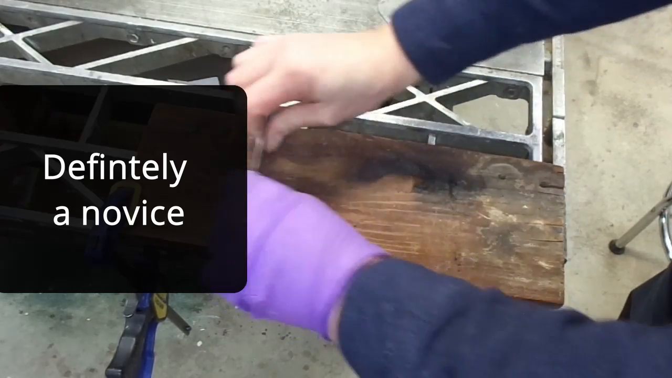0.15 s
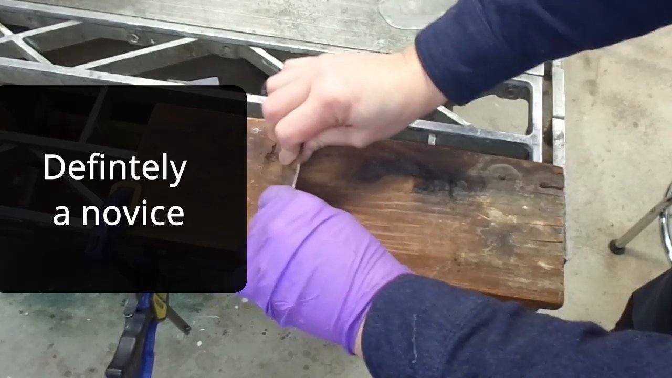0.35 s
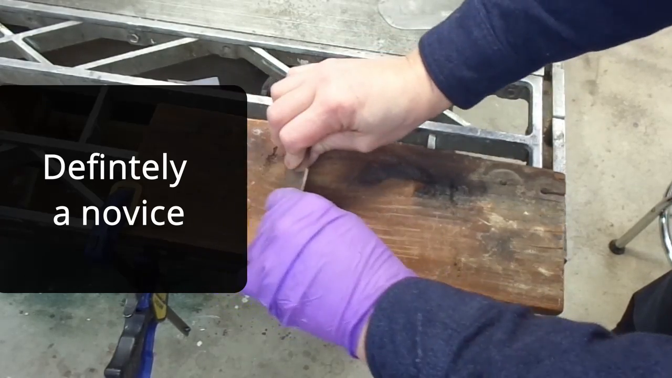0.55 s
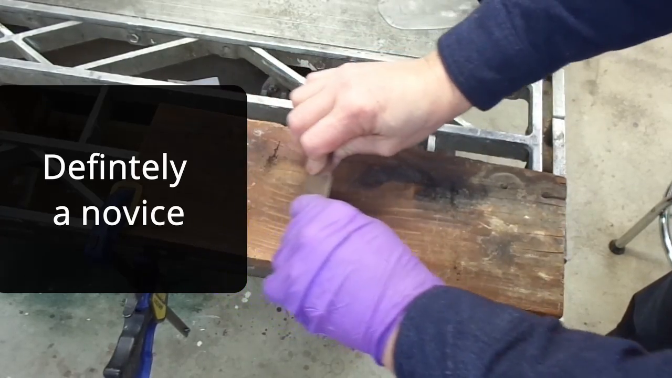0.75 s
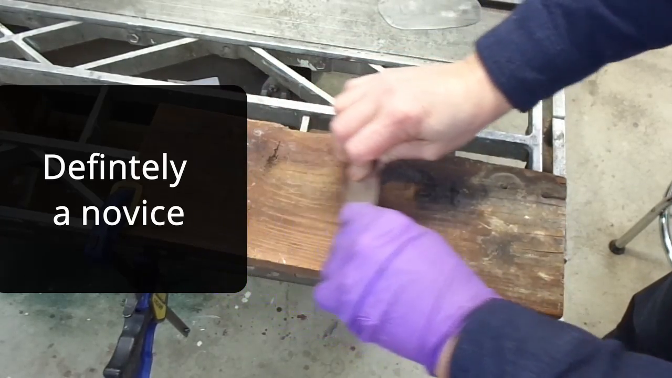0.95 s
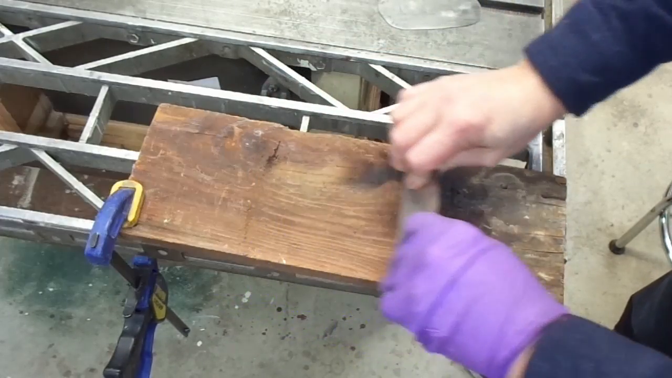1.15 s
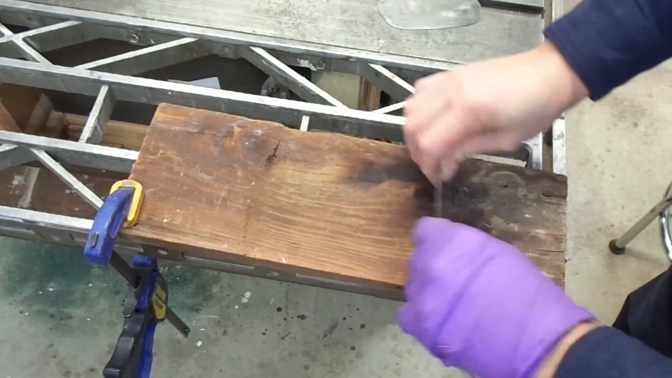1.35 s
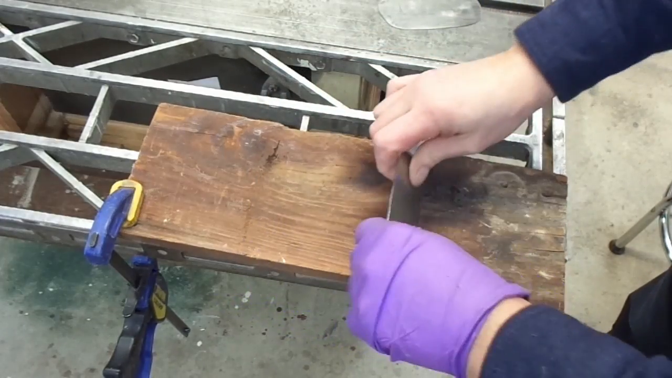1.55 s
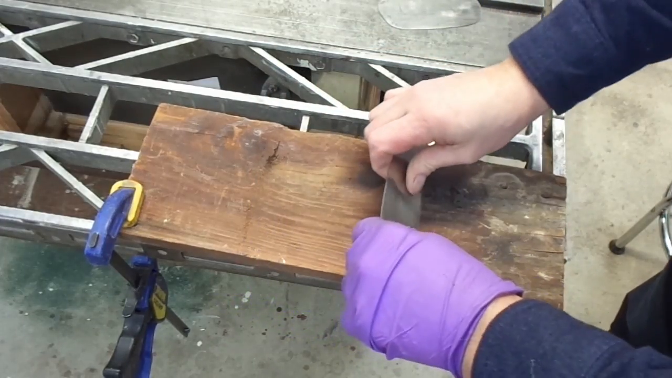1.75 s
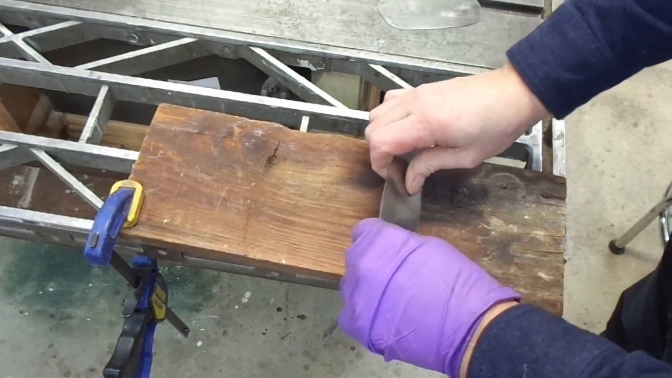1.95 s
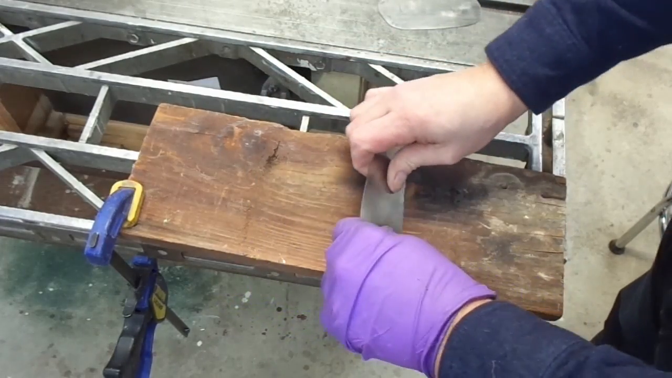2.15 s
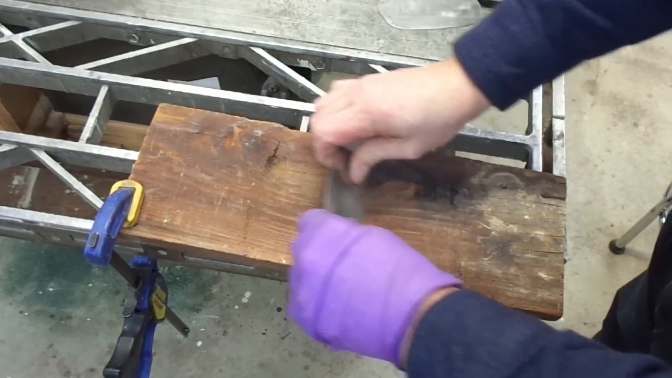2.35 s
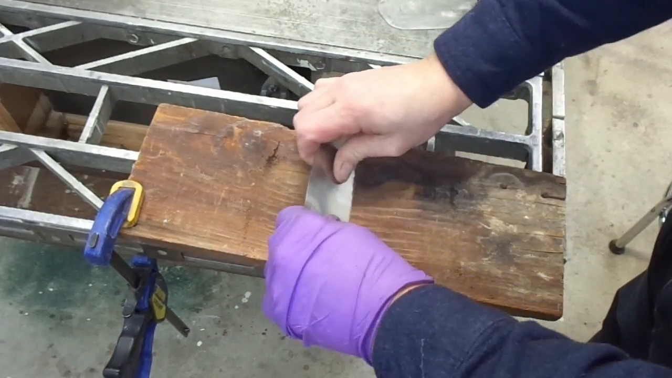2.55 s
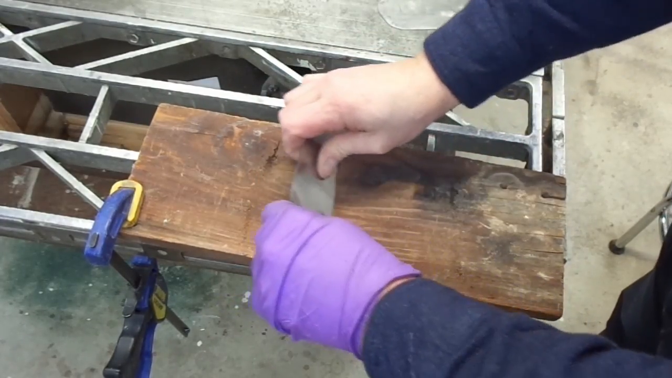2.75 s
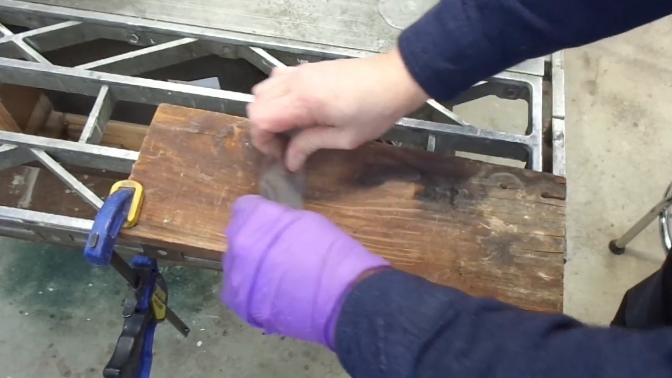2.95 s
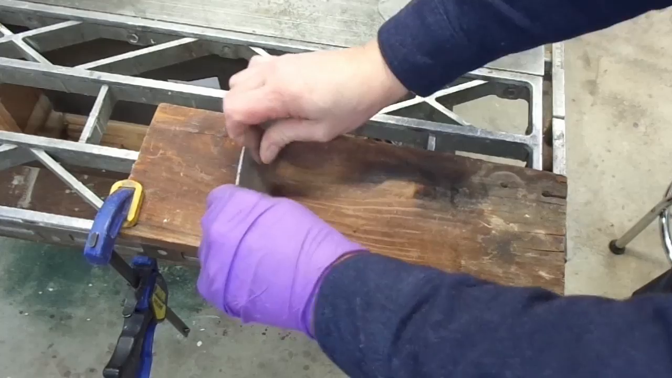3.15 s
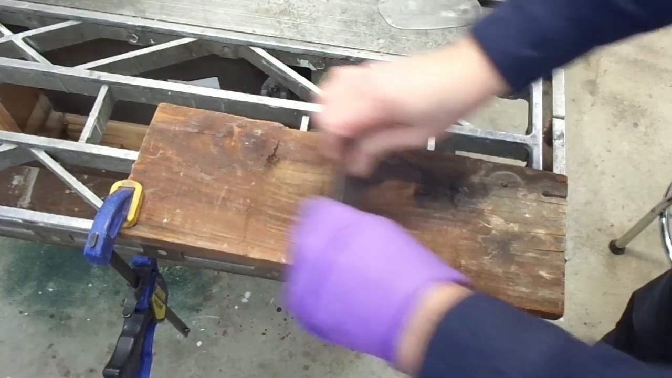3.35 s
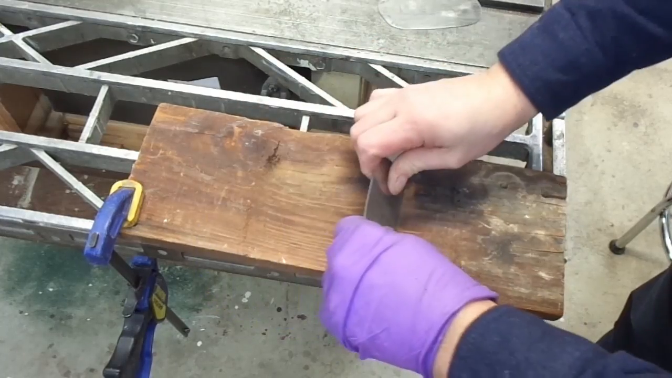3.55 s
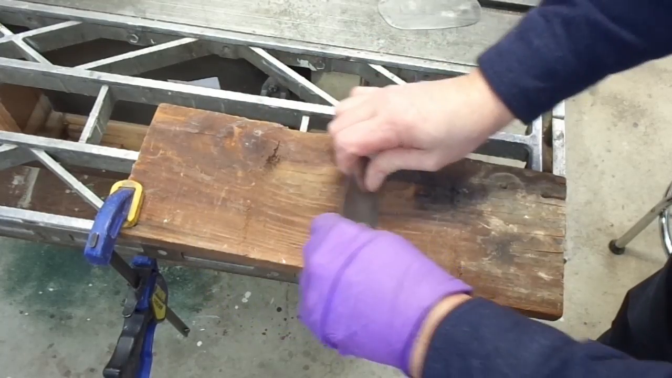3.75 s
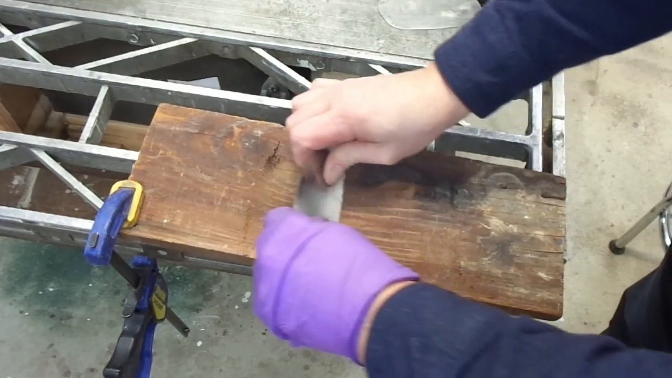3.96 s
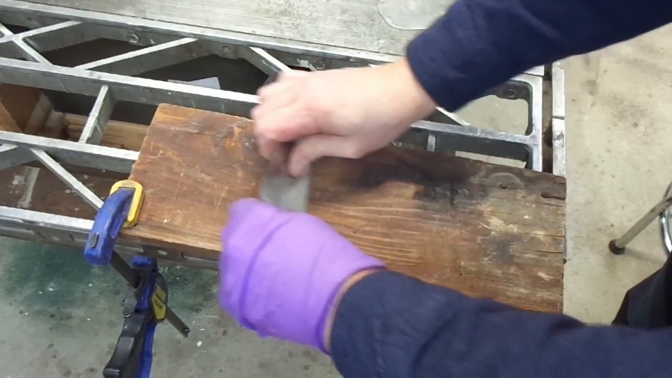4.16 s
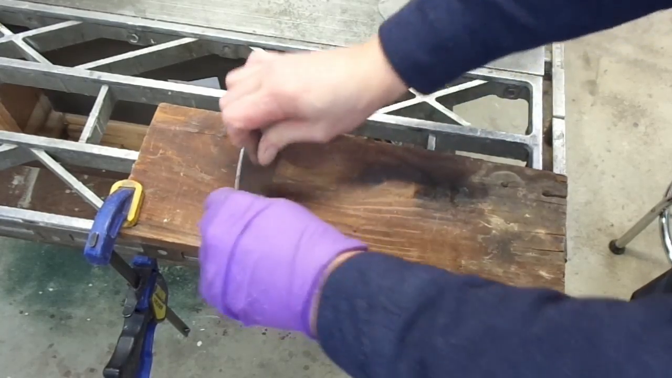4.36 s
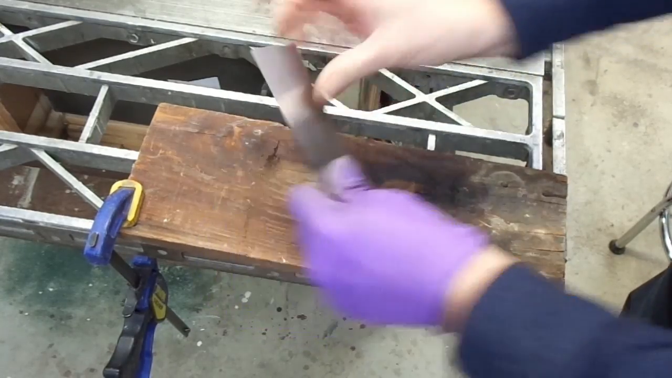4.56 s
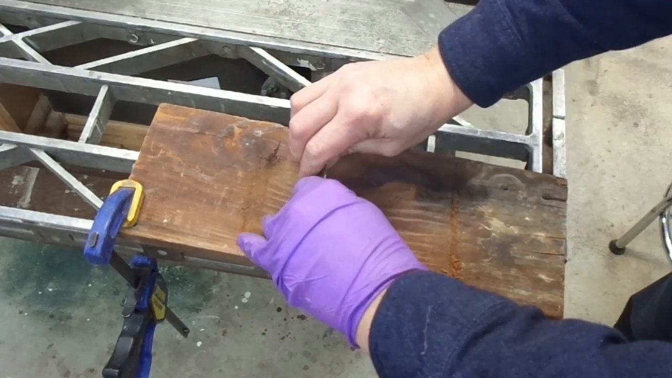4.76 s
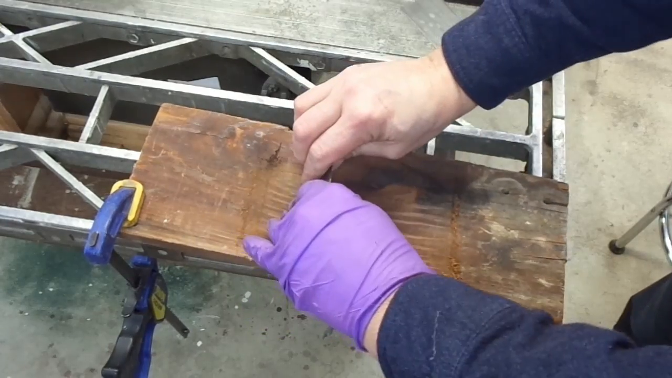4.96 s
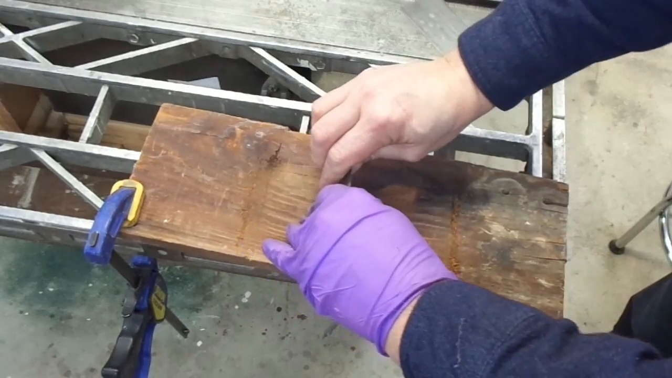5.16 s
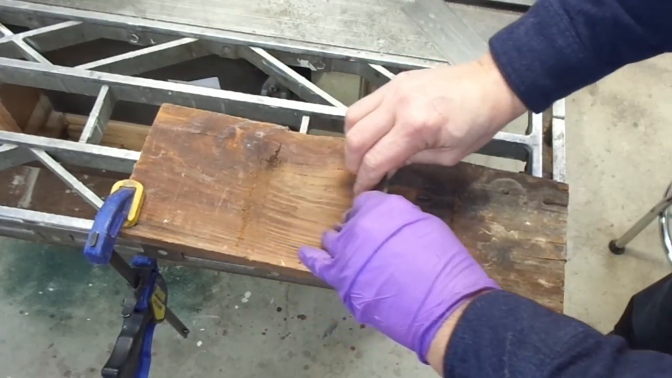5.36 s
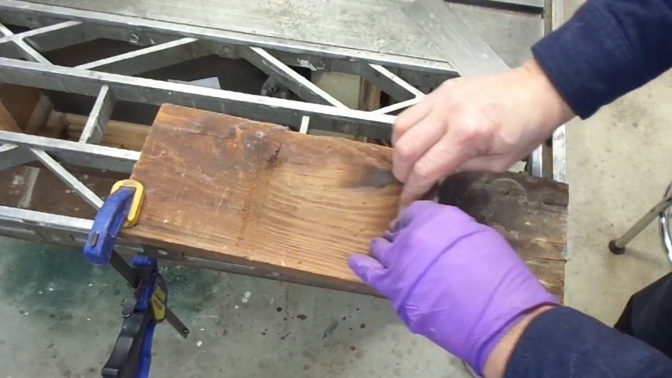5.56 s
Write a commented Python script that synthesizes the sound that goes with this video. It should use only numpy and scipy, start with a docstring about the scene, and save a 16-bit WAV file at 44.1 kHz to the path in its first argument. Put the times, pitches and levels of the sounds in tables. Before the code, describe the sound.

Close mono pickup of hand scraping on a clamped wooden board. Dry, grainy strokes swell and stop abruptly, with hollow woody body and papery treble hiss. Loud wooden knocks come early and midway, far above the scraping, and light steel finger ticks fill gaps. A short room tail and quiet background noise surround one long early push, several brief ones, two medium ones and a long closing one.

```python
"""A steel card scraper is pushed in dry strokes along a rough board clamped to a ladder in a workshop.
The tail of a push and a knock of the blade lead to one long, chattering push, more knocks and a finger tick;
five short scrapes, a tick, a knock, two more pushes and two ticks follow, then a last long push.
Strokes are random fibre snaps through board resonances; knocks and ticks are noise bursts and decaying modes.
The room adds a short tail of decaying noise, over a rush of coloured noise that drops a little near 4.65 s."""
import sys
import numpy as np
from scipy import signal
from scipy.fft import rfft, irfft
from scipy.io import wavfile

SR = 44100
rng = np.random.default_rng(int(sys.argv[2]) if len(sys.argv) > 2 else 0)


def master_out(mix):
    """Clip the mix to full scale and print it as 16-bit PCM to the path in sys.argv[1]."""
    frames = np.transpose(np.atleast_2d(mix))
    ceiling = np.clip(frames, -1, 1)
    pcm = np.round(ceiling * 32767).astype(np.int16)
    wavfile.write(sys.argv[1], SR, pcm)


N = 250929
TIME = np.arange(N) / SR


def from_db(db):
    """Decibels to gain."""
    return 10 ** (np.asarray(db) / 20)


def rms_one(x):
    """Scale to unit rms."""
    return x / np.sqrt(np.mean(x ** 2) + 1e-20)


def at_hz(points, hz):
    """Read a curve on a log-frequency axis."""
    point_hz, value = np.transpose(points)
    return np.interp(np.log(np.maximum(hz, 1)), np.log(point_hz), value)


def butter(x, hz, kind, order=2):
    """Causal Butterworth filter."""
    sos = signal.butter(order, np.clip(hz, 10, .45 * SR), kind, fs=SR, output="sos")
    return signal.sosfilt(sos, x + 1e-18)


def response(spectrum, size=8192):
    """The minimum-phase impulse response with this spectrum, by folding its cepstrum."""
    level_db = at_hz(spectrum, np.fft.rfftfreq(size, 1 / SR))
    cepstrum = irfft(np.log(from_db(level_db)))
    cepstrum[1:size // 2] *= 2
    cepstrum[size // 2 + 1:] = 0
    return irfft(np.exp(rfft(cepstrum)))


def through(x, impulse):
    """Pass a sound through an impulse response."""
    return signal.fftconvolve(x, impulse)[:N]


def resonance(x, hz, width_hz):
    """Two-pole resonance with gain 1 on top."""
    radius = np.exp(-np.pi * width_hz / SR)
    zeros = np.array([1, 0, -1]) * (1 - radius ** 2) / 2
    poles = [1, -2 * radius * np.cos(2 * np.pi * hz / SR), radius ** 2]
    return signal.lfilter(zeros, poles, x + 1e-18)


def lifted(x, peaks):
    """Raise each resonance in turn out of a broad sound."""
    for hz, width_hz, lift_db in peaks:
        x = x + (from_db(lift_db) - 1) * resonance(x, hz, width_hz)
    return x


def ringing(modes, t):
    """Decaying sine modes of alternating sign; each blow varies their levels at random by about 1 dB."""
    out = np.zeros(len(t))
    for k, (hz, level_db, t60_s) in enumerate(modes):
        envelope = from_db(level_db + rng.normal() - 60 * t / t60_s)
        out += (-1) ** k * envelope * np.sin(2 * np.pi * hz * t)
    return out


def add(track, s, sound):
    """Mix a short sound in at a time."""
    start = max(round(s * SR), 0)
    track[start:start + len(sound)] += sound[:N - start]


def workshop_rush():
    """Rush of the workshop, nearly steady, dropping a little near 4.65 s: noise with a broad colour and peaks."""
    # broad colour before levelling: pitch_hz, density_db (per Hz)
    rush_colour = [(12, -30), (20, -31), (32, -10.5), (64, -18.5), (194, -15.5), (263, -13.5), (387, -12.5),
                   (525, -10), (693, -11), (796, -11), (2550, -16.5), (2930, -17), (4200, -20), (5530, -22),
                   (15000, -23)]
    # resonances in the rush: pitch_hz, width_hz, lift_db
    rush_peaks = [(66.4, 6.9, 13.5), (123, 6, 8), (884, 90, 3), (1140, 100, 5.5)]
    # level in the mix: time_s, level_db
    rush_level = [(0, -60), (4.64, -59.5), (4.67, -63), (5.69, -61)]
    coloured = through(rng.standard_normal(N), response(rush_colour))
    time_s, level_db = np.transpose(rush_level)
    return rms_one(lifted(coloured, rush_peaks)) * from_db(np.interp(TIME, time_s, level_db))


def workshop_reflections(first_s):
    """Diffuse reflections of unit energy: bands of noise whose decay is shortest in the top treble."""
    # decay of the workshop: pitch_hz, t60_s
    room_decay = [(150, 0.71), (600, 0.21), (2000, 0.27), (5000, 0.19), (14000, 0.059)]
    t, out = np.arange(SR // 2) / SR, 0
    edges_hz = np.geomspace(80, 18000, 10)
    for low_hz, high_hz in zip(edges_hz, edges_hz[1:]):
        band = butter(rng.standard_normal(len(t)), [low_hz, high_hz], "band")
        t60_s = at_hz(room_decay, np.sqrt(low_hz * high_hz))
        out = out + band * np.exp(-np.log(1000) * t / t60_s)
    return rms_one(out * (t > first_s)) / np.sqrt(len(t))


def blade_ticks(tick_s, width_hz):
    """Blade handled in the fingers: a short resonant noise tick while the thin steel rings down."""
    # ticks: start_s, tick_db, tick_centre_hz, ring_db
    finger_ticks = [(1.837, -37.5, 4260, -85), (3.195, -35, 3800, -82), (4.5117, -39, 2600, -51),
                    (4.55, -49, 4800, -47)]
    # modes of the steel blade: pitch_hz, level_db, t60_s
    blade_modes = [(917, -3.5, 0.16), (2450, -10.5, 0.12), (4740, -11.5, 0.12), (5421, -13, .08)]
    out, t = np.zeros(N), np.arange(SR // 2) / SR
    for start_s, tick_db, tick_hz, ring_db in finger_ticks:
        burst = rng.standard_normal(len(t)) * np.exp(-t / tick_s)
        tick = resonance(burst, tick_hz, width_hz)
        add(out, start_s, from_db(tick_db) * tick + from_db(ring_db) * ringing(blade_modes, t))
    return out


def knocks(ring_db, crack_s, rattle_db, rattle_s, low_cut_hz):
    """Blade set down: thud, board modes and ladder rattle, dulled by a soft contact; a steel corner cracks."""
    # blows: start_s, level_db, contact_cutoff_hz, crack_db (re blow)
    blows = [(0.3051, -15, 890, -37), (0.3153, -15.5, 1720, -15), (0.3215, -28, 1950, -20),
             (1.5217, -25.5, 1180, -26), (1.5642, -50, 1500, -21), (1.5974, -38, 890, -30),
             (3.5147, -16.5, 1980, -30)]
    # colour of the first thud: pitch_hz, level_db
    thud_colour = [(50, -37), (150, -63), (350, -10), (650, -11.5), (1050, -4), (1400, 3.5), (1700, -4),
                   (2300, 4), (2700, -17), (5000, -13.5), (15000, -79)]
    # first swing of the board under the blow: pitch_hz, level_db, t60_s
    swing_modes = [(1123, 0, 0.014), (633, -9.5, 0.018)]
    # modes of the free board: pitch_hz, level_db, t60_s
    board_modes = [(380, -24, 0.21), (530, -23, 0.3), (649, -9, .12), (680, -32, 0.091), (900, -23, 0.12),
                   (980, -26, 0.088), (1160, -24, 0.075), (1100, -13, 0.098), (1140, -26, 0.15),
                   (1450, -1.5, 0.075), (1610, -8, 0.074), (1820, -22.5, 0.15), (1810, -7, 0.17),
                   (2040, -21, 0.064), (2320, -9, 0.12), (2347, -4, .1)]
    # steel struck on its corner: pitch_hz, width_hz, lift_db
    corner_peaks = [(2990, 150, 16.5), (3510, 91, 14.5), (5800, 51, 7), (6770, 51, 1)]
    out, thud = np.zeros(N), response(thud_colour)
    thud = thud / np.abs(thud).max()
    t = np.arange(len(thud)) / SR
    for start_s, level_db, contact_hz, crack_db in blows:
        shaking = rng.standard_normal(len(t)) * t / rattle_s * np.exp(-t / rattle_s)
        rattle = through(shaking, thud)[:len(t)]
        body = .5 * thud + ringing(swing_modes, t)
        body = body + from_db(ring_db) * ringing(board_modes, t) + from_db(rattle_db) * rattle
        dulled = butter(body, contact_hz, "low", order=3)
        burst = rng.standard_normal(len(t)) * np.exp(-t / crack_s)
        crack = lifted(butter(burst, [900, 3500], "band", order=1), corner_peaks)
        add(out, start_s, from_db(level_db) * (dulled + from_db(crack_db) * crack))
    return butter(out, low_cut_hz, "high")


def catches(board, slip_s):
    """The edge hangs on a ridge of the grain and slips free with a short, dull jolt of the board."""
    # slips: start_s, peak_db
    slips = [(0.845, -45), (1.179, -32), (1.297, -35), (2.221, -36), (2.857, -37.5), (3.04, -39),
             (4.1417, -36), (4.1804, -33.5), (4.24, -38.5), (5.055, -45), (5.4843, -40)]
    out, t = np.zeros(N), np.arange(len(board)) / SR
    for start_s, peak_db in slips:
        burst = rng.standard_normal(len(t)) * np.exp(-t / slip_s)
        jolt = butter(through(burst, board), 1170, "low")
        add(out, start_s, from_db(peak_db) * jolt / np.abs(jolt).max())
    return out


def chatter(snaps):
    """The flexed blade chatters: snaps in one resonance swell and fade as the grip changes."""
    # spells of chatter: start_s, end_s, pitch_hz, width_hz, level_db (at the top of the swell)
    spells = [(0, 0.077, 1680, 500, -52), (0.58, 1.38, 1020, 380, -50.5), (0.632, 1.334, 2480, 263, -52),
              (0.81, 1.372, 3020, 540, -46.5), (1.271, 1.334, 1380, 506, -38.5),
              (2.96, 3.108, 3700, 120, -61), (3.664, 3.937, 5520, 700, -57.5), (4.232, 4.31, 1696, 80, -48),
              (5.014, 5.705, 1260, 90, -73), (5.016, 5.546, 3150, 150, -66.5), (5.288, 5.65, 2300, 90, -63),
              (5.117, 5.732, 5370, 800, -66)]
    out = np.zeros(N)
    for start_s, end_s, hz, width_hz, level_db in spells:
        swell = np.sin(np.pi * np.clip((TIME - start_s) / (end_s - start_s), 0, 1))
        tone = resonance(resonance(snaps, hz, width_hz), hz, 2 * width_hz)
        out += from_db(level_db) * swell * rms_one(tone)
    return out


def fibre_snaps(per_s, spread_db, rub, waver_hz, waver_db):
    """Fibres snap at random over smooth rubbing, evenly dense, with barely any waver in level."""
    sizes = from_db(spread_db * np.minimum(rng.exponential(1, N), 4)) * rng.choice([-1, 1], N)
    snaps = rms_one(sizes * (rng.random(N) < per_s / SR))
    waver = rms_one(butter(rng.standard_normal(N), waver_hz, "low"))
    return rms_one((snaps + rub * rng.standard_normal(N)) * from_db(waver_db * waver))


def steel_colour(x, depth_db, ring_s):
    """The blade's countless high modes, as a short noise burst, lay a fixed, ridged colour on the treble."""
    t = np.arange(4096) / SR
    modes = rms_one(rng.standard_normal(len(t)) * t * np.exp(-t / ring_s)) / np.sqrt(len(t))
    return x + from_db(depth_db) * through(x, butter(modes, [3300, 9000], "band"))


def driven(x, modes, force):
    """Modes that swell to the level of the force and ring on when it stops."""
    def sound(drive):
        return sum(from_db(level_db) * resonance(drive, hz, width_hz) for hz, width_hz, level_db in modes)
    return sound(x * force) / np.std(sound(x))


def stroke_gains():
    """Drag, rasp, hiss, hollow and bending gains: pushes set in, swell as the edge's bite changes, let go."""
    # pushes of the blade, levels ahead of the trim in scraping(): start_s, end_s, attack_s,
    # drag_start_db, drag_end_db, mid_swell_db, bite_start_db and bite_end_db (edge re drag),
    # shaving_hiss_db (re rasp), bending_db (re drag), hollow_db (re the rest of the board)
    pushes = [(0, 0.065, 0.002, -43.5, -49.5, -4, 4, 2, -4.5, -29, -5),
              (0.486, 1.305, .11, -55.5, -42, 3.5, -1, 3.5, -6, -19.5, -12.5),
              (1.993, 2.073, 0.011, -53.5, -48, 1, 5.5, -1, -7, -9, -3),
              (2.2, 2.436, 0.026, -51, -46.5, 1, -0.5, -2.5, -5, -18.5, -3.5),
              (2.646, 2.746, 0.038, -48, -51.5, 1, -12, -2.5, -4.5, -26, 1.5),
              (2.736, 2.89, 0.032, -56.5, -49.5, 4, -7.5, -10, -5.5, -15, 4),
              (2.878, 3.198, 0.042, -49, -52.5, 3.5, -6, -1, -5.5, -26, -1),
              (3.631, 3.941, 0.022, -56.5, -47.5, 3, -0.5, -3.5, -3.5, -20.5, -2),
              (3.935, 4.344, 0.025, -50.5, -51.5, 3.5, -10.5, 2, -4.5, -24, -3),
              (5.001, 5.645, 0.031, -57.5, -44.5, 1, -9.5, -8.5, -5, -18.5, -21)]
    # when the push stops, the board's drag dies away and the edge lets go sooner
    drag_release_db_per_s, edge_release_db_per_s = 261, 477
    bending_follows = 0.58  # extra dB of bending for each dB that the drag rises within a push
    hiss_rise_db = 4.5  # from start to end of a push, as the shaving lengthens
    gains = np.zeros((5, N))
    for (start_s, end_s, attack_s, first_db, last_db, swell_db, first_bite_db, last_bite_db,
         shaving_db, bending_db, hollow_db) in pushes:
        along = np.clip((TIME - start_s) / (end_s - start_s), 0, 1)
        contact = np.clip((TIME - start_s) / max(attack_s, 1 / SR), 0, 1)
        after_s = np.maximum(TIME - end_s, 0)
        push_db = first_db + (last_db - first_db) * along + swell_db * np.sin(np.pi * along)
        bite_db = first_bite_db + (last_bite_db - first_bite_db) * along
        drag_db = push_db - drag_release_db_per_s * after_s
        rasp_db = push_db + bite_db - edge_release_db_per_s * after_s
        hiss_db = rasp_db + shaving_db + hiss_rise_db * (along - .5)
        flex_db = bending_db + bending_follows * (push_db - (first_db + last_db) / 2)
        # the hollow modes take their share of the drag from the rest of the board
        rest_db = drag_db - 20 * np.log10(np.hypot(1, from_db(hollow_db)))
        levels_db = [rest_db, rasp_db, hiss_db, rest_db + hollow_db, drag_db + flex_db]
        gains = np.hypot(gains, contact * from_db(levels_db))  # overlapping pushes add in power
    return gains


def scraping():
    """Snapping fibres drive the board's drag and low modes, the edge's rasp and the shaving's hiss."""
    # colour of the scraping before levelling: pitch_hz, density_db (per Hz)
    friction_colour = [(60, -51), (130, -19.5), (240, -10), (460, -6.5), (820, -3), (1200, -2.5),
                       (1400, -2), (2400, -5.5), (2640, -10), (3100, -7.5), (4030, -13), (6300, -14),
                       (8000, -15), (12500, -12.5), (15000, -25)]
    # resonances of the board with the blade pressed on it: pitch_hz, width_hz, lift_db
    pressed_peaks = [(318, 34, 4.5), (402, 8.7, 2.5), (513, 20, 9), (649.3, 30, 13), (710, 30, 4.5),
                     (815, 14, -4), (876, 26, 8.5), (1070, 28, 3), (1191, 27, 11), (1251, 17, 5.5),
                     (1241, 17, 7), (1466.4, 14, 9.5), (1663, 16, 6.5), (1830, 17, 1), (1994, 30, 6),
                     (2204, 23, 7.5), (2426, 29, 6), (3074, 19, -3), (3370, 430, 3.5), (4900, 390, 2)]
    # low modes of the board, levels relative within each set: pitch_hz, width_hz, level_db
    bending_modes = [(176.5, 7.5, 0)]
    hollow_modes = [(515.3, 27, -1.5), (549, 8.3, -2.5), (648, 9.6, -1.5)]
    snaps = fibre_snaps(per_s=3700, spread_db=-1.0, rub=0.64, waver_hz=120, waver_db=0.05)
    judder = fibre_snaps(per_s=700, spread_db=2.5, rub=0.15, waver_hz=40.5, waver_db=0.04)
    board = lifted(response(friction_colour), pressed_peaks)
    wood = through(snaps, board)
    upper = steel_colour(butter(wood, 1577, "high", order=4), depth_db=-9.5, ring_s=0.0013)
    drag, rasp, hiss, hollow, bending = stroke_gains()
    body = drag * rms_one(butter(wood, 2005, "low", order=4))
    body = body + driven(judder, hollow_modes, hollow) + driven(judder, bending_modes, bending)
    edge = rasp * rms_one(butter(upper, 5550, "low", order=4))
    edge = edge + hiss * rms_one(butter(upper, 4630, "high", order=4))
    trim = from_db(-2.5)
    return trim * (body + edge) + chatter(judder) + catches(board, slip_s=0.00089)


def scene():
    """Scraper and board in the room, the same mono sound in both channels."""
    rush = workshop_rush()
    blows = knocks(ring_db=-13.5, crack_s=0.0021, rattle_db=-16.0, rattle_s=0.0051, low_cut_hz=260)
    blows = blows + blade_ticks(tick_s=0.0046, width_hz=990)
    strokes = scraping()
    room_send = from_db(-12.5) * strokes + from_db(-11.5) * blows
    reflections = through(room_send, workshop_reflections(first_s=0.0049))
    mono = strokes + blows + reflections + rush
    return np.array([mono, mono])


def record(dry):
    """A steep elliptic low-pass cuts the top."""
    cutoff_hz = 15150
    return signal.sosfilt(signal.ellip(12, .1, 70, cutoff_hz, fs=SR, output="sos"), dry)


dry = scene()
out = record(dry)
master_out(out)
```